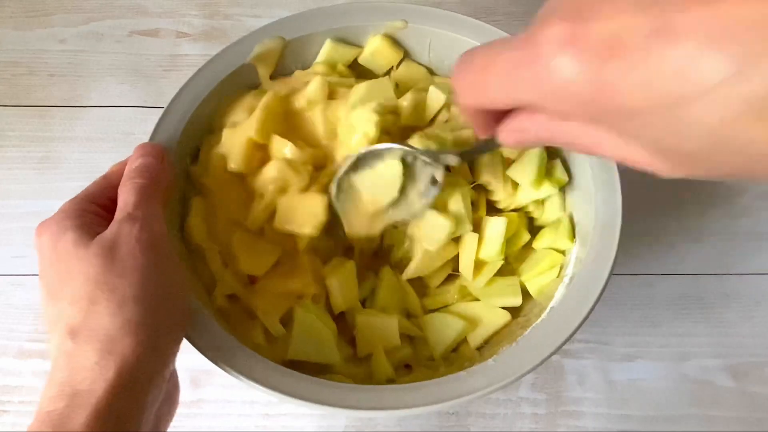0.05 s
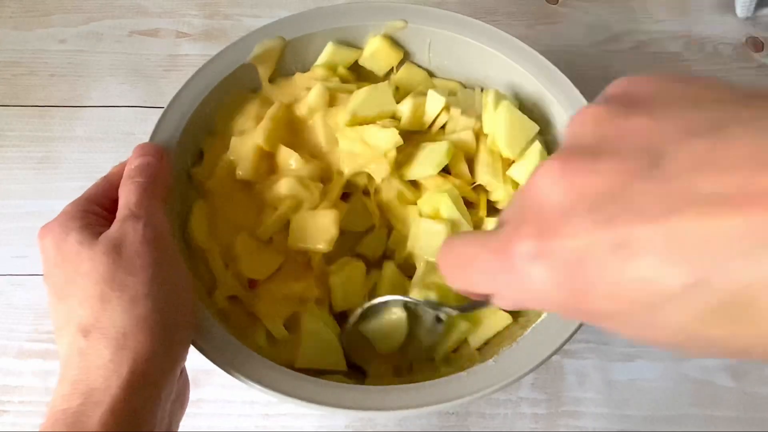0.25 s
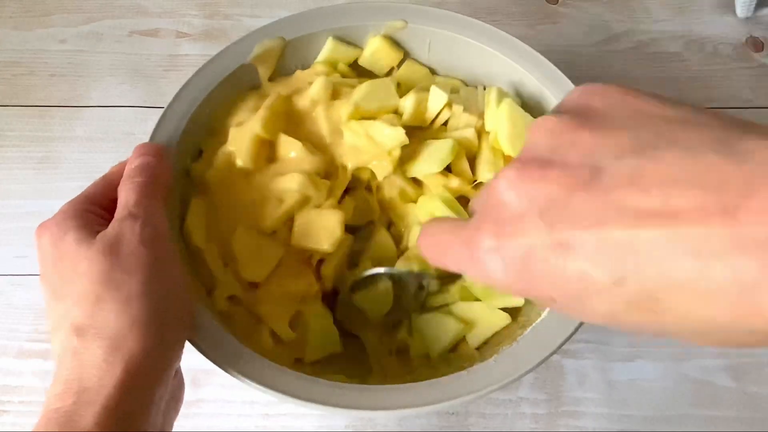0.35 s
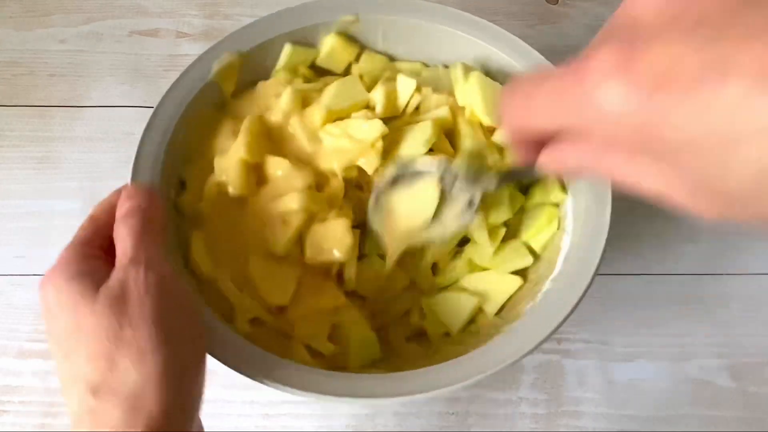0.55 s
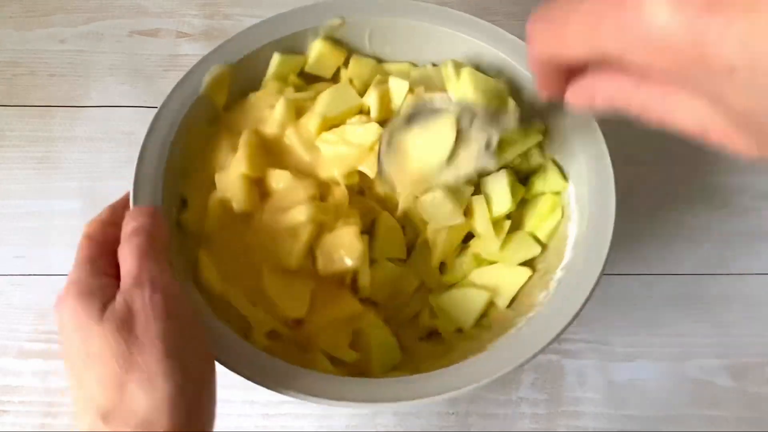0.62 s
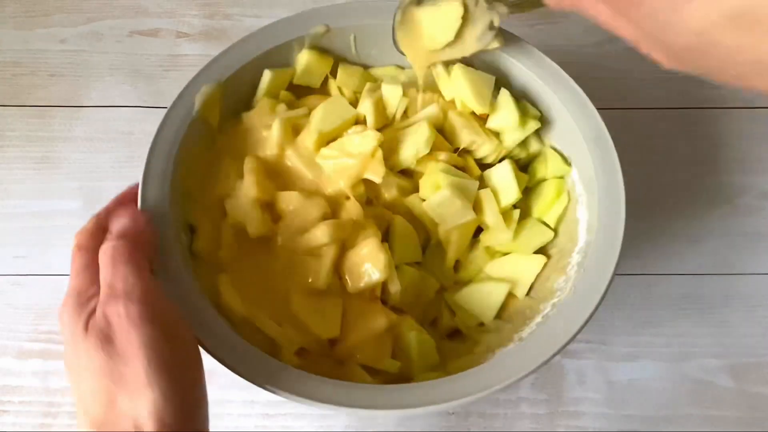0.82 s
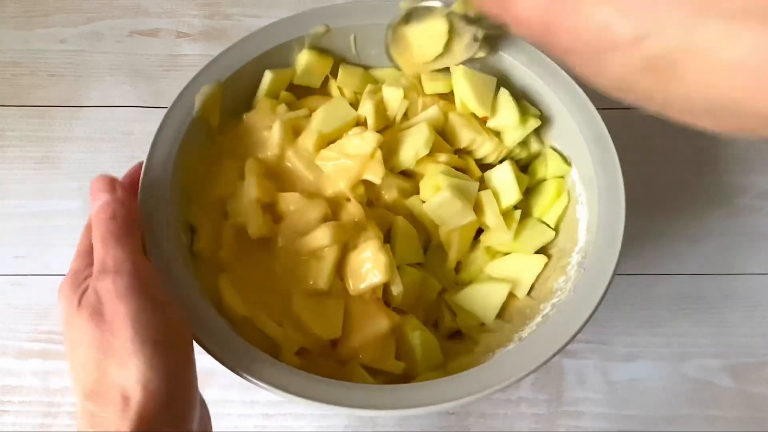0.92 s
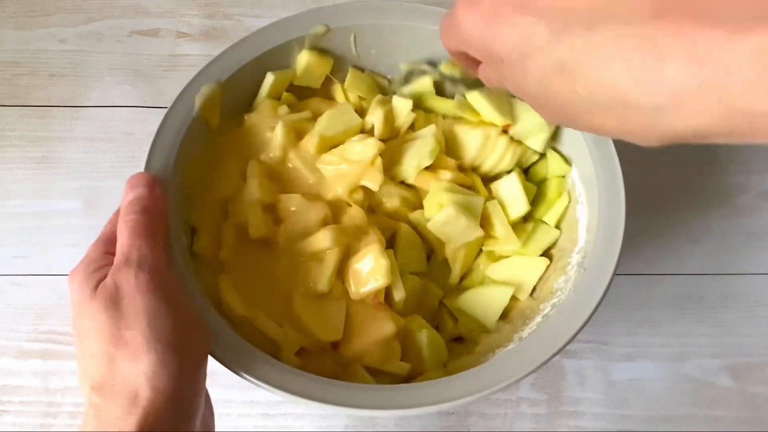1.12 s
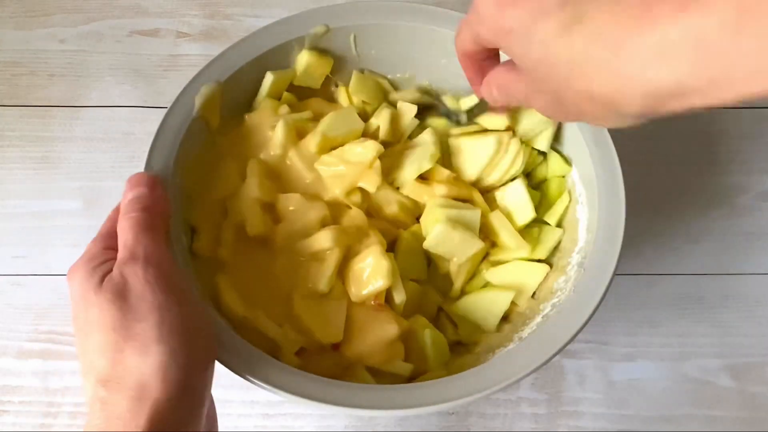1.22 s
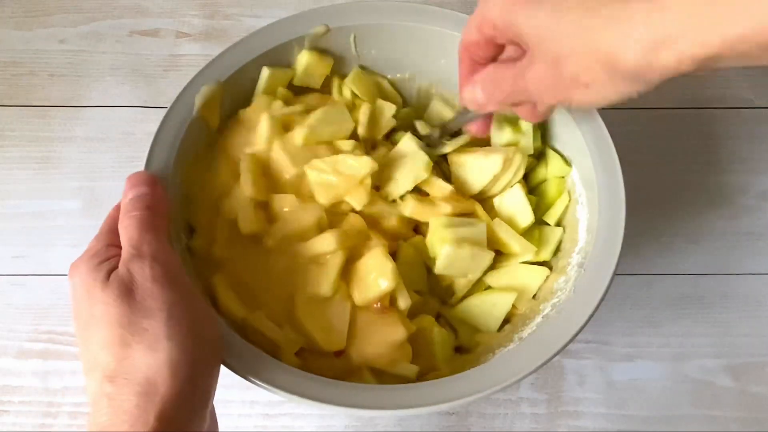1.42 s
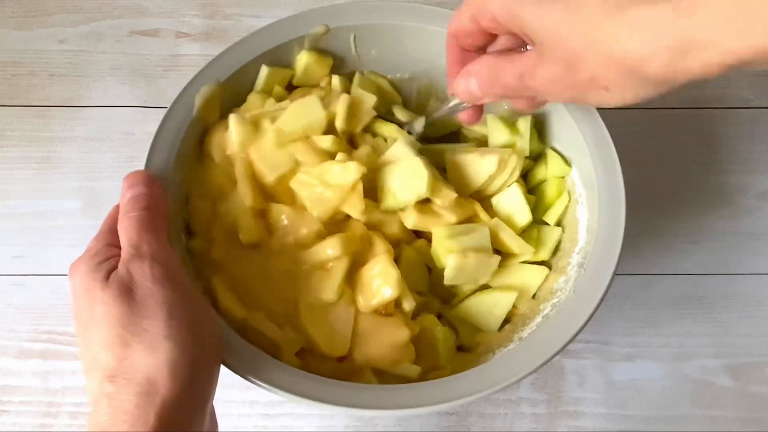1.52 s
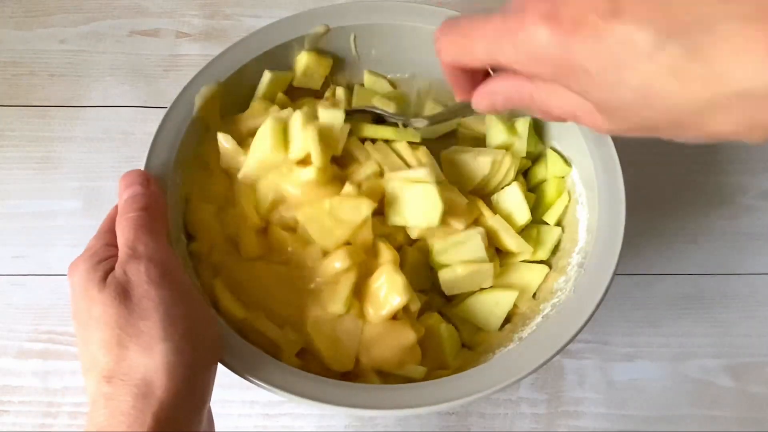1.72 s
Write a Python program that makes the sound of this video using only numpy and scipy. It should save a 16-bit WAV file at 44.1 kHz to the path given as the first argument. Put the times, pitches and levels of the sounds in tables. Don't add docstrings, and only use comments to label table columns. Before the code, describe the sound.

Spoon stirring fruit pieces through batter in a heavy bowl, with one hard knock, rasps and clicks

```python
import sys
import numpy as np
from scipy import signal
from scipy.fft import rfft, irfft, next_fast_len
from scipy.io import wavfile
from scipy.ndimage import map_coordinates

SR = 44100
rng = np.random.default_rng(int(sys.argv[2]) if len(sys.argv) > 2 else 0)


def gain_from_db(level_db):
    decades = np.asarray(level_db, float) / 20
    return 10 ** decades


def store_wav(level_fs):
    pcm = np.round(np.clip(np.atleast_2d(level_fs), -1, 1) * 32767)
    wavfile.write(sys.argv[1], SR, pcm.T.astype(np.int16))


N = 77175

# pitch_hz, level_db (per Hz)
HUM_SPECTRUM = [(25, -55), (55, 9), (100, -8.5), (170, 0.5), (270, -16.5), (480, -17), (700, -45.5),
                (1500, -53)]
HISS_SPECTRUM = [(600, 16), (1500, 20), (3000, 40), (5500, -8), (6500, -61.5), (12000, -64), (15600, -42),
                 (16200, -77)]
# pitch_hz, width_hz, level_db
PIPE_DRONE = [(489.3, 21, -64)]
# time_s, scrape_db, batter_db, loaded_spoon_db, dryness_db
STIR_GESTURE = [(0, -80, 14, 23, 11.5), (0.196, -98, 31.5, -29, 23.5), (0.219, -41.5, 2, -7, -5.5),
                (0.328, -48.5, 1, 0, 1), (0.454, -66.5, 13, 12.5, 5.5), (.69, -61.5, 11, 4, -11.5),
                (.78, -68, -2, 1.5, -16), (.838, -69.5, -2, -1, -22.5), (0.861, -68, -26, 2, 8),
                (0.952, -66.5, -24, -2, 7.5), (1.011, -41, -19, -8.5, -7), (1.15, -56, 0.5, 5.5, 5),
                (1.201, -48.5, -2, 6.5, -1), (1.29, -55.5, 1.5, 10.5, 3), (1.366, -64, -0.5, 11.5, 4.5),
                (1.53, -67.5, 13, 10, 7), (1.6, -75.5, 13, 11.5, 8.5), (1.75, -70, 7.5, 10.5, 7.5)]
# pitch_hz, level_db (per Hz)
RASP_SPECTRUM = [(300, 9.5), (900, -5), (2500, 3), (5000, -3), (7000, 0), (11000, -5), (15500, -10.5),
                 (16200, -44)]
# pitch_hz, width_hz, level_db
BARE_BOWL_MODES = [(2038, 42, -1), (2274, 80, -6), (2606, 130, -4), (2845, 74, -3.5), (3343, 145, -4.5),
                   (4900, 92, -21), (5060, 260, -22)]
LOADED_BOWL_MODES = [(904, 37, -0.5), (1262, 287, -3), (3960, 82, -8.5), (4420, 38, -8.5), (4870, 190, -12),
                     (5280, 65, -7)]
BATTER_MODES = [(358.6, 67, 0.5), (544, 162, -0.5), (836, 330, -2)]
# start_s, length_s, level_db, pitch_hz
EDGE_CHATTERS = [(.01, .1, -53.5, 190.3), (0.02, 0.046, -60.5, 342), (0.2, 0.012, -49, 2800),
                 (0.277, 0.011, -46, 6040), (0.28, 0.014, -50, 1853), (0.284, 0.069, -44, 195),
                 (0.304, 0.013, -49.5, 4540), (.335, 0.015, -52.5, 1610), (0.338, 0.01, -54, 5620),
                 (.538, 0.0096, -54.5, 1352), (.539, 0.0084, -63.5, 2800), (0.623, 0.096, -51.5, 189),
                 (.841, .011, -58, 4170), (.842, 0.0096, -56.5, 1076), (0.874, 0.014, -60.5, 2552),
                 (0.893, .025, -63, 4090), (0.897, 0.015, -65, 2150), (1.615, 0.019, -72, 2340),
                 (1.666, .04, -67.5, 2320), (.228, 0.011, -41, 2750), (.975, 0.028, -56, 5960),
                 (.976, .025, -59, 2310), (0.982, 0.029, -59.5, 4900), (0.994, .025, -51.5, 2250),
                 (1.016, 0.022, -46.5, 2820), (1.018, 0.021, -66, 5460), (1.02, 0.029, -60, 3300),
                 (1.038, .016, -55, 2520), (1.05, 0.013, -57, 5600), (1.055, 0.018, -53, 2750),
                 (1.075, 0.022, -59, 3350), (1.091, 0.022, -52, 2090), (1.094, 0.018, -55, 1290),
                 (1.103, 0.026, -55, 2800), (1.126, 0.016, -56.5, 4900), (1.132, 0.01, -52.5, 1300),
                 (1.233, 0.044, -54.5, 2800), (1.238, 0.054, -56.5, 3310), (1.287, 0.032, -60, 2750),
                 (1.4, 0.046, -62.5, 3350), (1.451, 0.046, -62.5, 2350), (1.472, 0.0088, -63, 2750),
                 (1.493, 0.017, -62.5, 3450), (1.506, 0.027, -56, 950), (1.53, 0.028, -56.5, 829),
                 (1.534, 0.015, -56, 1350)]
# time_s, pitch_hz, level_db
AIR_POCKET = [
    (1.17, 1320, -59),
    (1.2, 1320, -51.5),
    (1.235, 1330, -56),
    (1.254, 1300, -72),
    (1.275, 1290, -58),
    (1.325, 1230, -63),
    (1.392, 1250, -61),
    (1.429, 1050, -62),
    (1.5, 950, -69),
]
# pitch_hz, level_db, t60_s
BOWL_MODES = [(553, -22, 0.072), (630, 8, 0.015), (673.6, -8.5, 0.056), (738, -6, 0.067), (923, -31.5, 0.5),
              (1040, -2, 0.0017), (1317, -5.5, 0.012), (1900, -27.5, 0.06), (2456, -12.5, 0.036),
              (2668, -5.5, 0.02), (2950, -24, 0.075), (3333, -12, 0.022), (3990, -4, 0.0063),
              (6210, -21, 0.013)]
TABLE_MODES = [(76.6, -10, 0.12), (121.7, -13.5, 0.089), (188.9, -5, 0.067), (348, -7.5, 0.056),
               (394, -10, 0.091), (438.7, -3.5, 0.022)]
# start_s, level_db
LIGHT_TAPS = [
    (.2915, -33),
    (.5397, -47.5),
]
# start_s, level_db, pitch_hz, snap_db
SMALL_TICKS = [(0.2812, -40, 1840, -40), (0.293, -41.5, 1890, -15), (0.405, -44.5, 5000, 14),
               (0.54, -48.5, 2000, -32), (0.843, -46, 4010, -1.5), (0.8439, -59.5, 1170, -15),
               (0.8834, -57.5, 1270, 13), (1.0954, -47, 2130, -34), (1.164, -38.5, 2900, -28),
               (1.1755, -28.5, 5800, 1), (1.176, -31, 4950, -19), (1.1747, -33.5, 2750, -16),
               (1.424, -52, 1030, -30), (1.456, -52.5, 2310, 13), (1.495, -55, 3450, 14.5),
               (1.5462, -54, 870, -25), (1.518, -52, 850, -27), (1.6902, -46, 5370, 1.5),
               (1.713, -56, 2300, -28)]
# multiple (of its pitch), level_db
TICK_PARTIALS = [(0.641, -9.5), (0.999, 5.5), (1.33, -11.5)]
# start_s, level_db, pitch_hz
STEEL_CLICK = [
    (1.1731, -16, 5500),
    (1.1732, -25, 10500),
    (1.1732, -28, 15000),
]
# start_s, level_db, pitch_hz
FRUIT_THUDS = [
    (0.295, -55, 190),
    (0.378, -25.5, 79.4),
    (0.556, -60, 154),
    (1.1671, -23.5, 194),
    (1.165, -34, 385),
    (1.175, -23.5, 79),
    (1.265, -38, 215),
    (1.402, -29.5, 170),
    (1.443, -28.5, 146),
    (1.529, -33, 152),
]
# pitch_hz, t60_s
ROOM_DECAY = [(80, 0.87), (500, 0.28), (2000, 0.21), (8000, 0.21)]
# pitch_hz, likeness (0 to 1)
PORT_LIKENESS = [(150, 0.99), (350, 0.88), (650, 0.28), (1300, 0.57), (2500, 0.46), (4000, 0.12),
                 (5000, 0.87), (5400, 0.63)]
# pitch_hz, level_db
LEFT_OVER_RIGHT = [(150, 0.5), (370, 6.5), (850, 0), (1500, 0), (2800, -2), (3500, -1), (4300, -3.5),
                   (5500, 2)]
# pitch_hz, lead (half turns)
LEFT_PHASE_LEAD = [(5500, 0), (6500, 1), (8100, 1), (9700, 2), (11400, 2), (12600, 3), (14300, 3),
                   (15300, 4)]

TREBLE_HZ = 5500


def unit(x):
    return x / np.sqrt(np.mean(x ** 2) + 1e-20)


def along(points, hz):
    point_hz, value = np.transpose(points)
    return np.interp(np.log(hz + 1), np.log(point_hz + 1), value)


def wobble(rate):
    knots = rng.standard_normal(int(N * rate / SR) + 4)
    return map_coordinates(knots, [np.arange(N) * rate / SR])


def filtered(x, response):
    size = next_fast_len(N + SR // 2)
    return irfft(rfft(x, size) * response(np.fft.rfftfreq(size, 1 / SR)), size)[..., :N]


def resonances(peaks):
    def response(f):
        total = 0
        for k, (hz, width, db) in enumerate(peaks):
            damping = 1j * f * width
            total = total + (-1) ** k * gain_from_db(db) * damping / (hz * hz - f * f + damping)
        return total
    return response


def spread(pair, most=1):
    def angle(hz):
        turning = np.sin(np.pi * along(LEFT_PHASE_LEAD, hz)) ** 2
        treble = np.minimum(1 - 0.6 * turning, most)
        likeness = np.where(hz < TREBLE_HZ, along(PORT_LIKENESS, hz), treble)
        return np.arccos(np.clip(likeness, -1, 1)) / 2

    mid, side = filtered(pair, lambda hz: np.array([np.cos(angle(hz)), np.sin(angle(hz))]))
    return np.array([mid + side, mid - side])


def ring(hz, t60, rise_s):
    t = np.arange(SR // 2) / SR
    return gain_from_db(-60 * t / t60) * (1 - np.exp(-t / rise_s)) * np.sin(2 * np.pi * hz * t)


def crack(t60, rise_s):
    t = np.arange(SR // 10) / SR
    return gain_from_db(-60 * t / t60) * (1 - np.exp(-t / rise_s)) * rng.standard_normal(SR // 10)


def add(track, s, sound):
    part = track[round(s * SR):][:len(sound)]
    part += sound[:len(part)]


def narrow(phase, width_hz):
    slow = np.array([wobble(width_hz) + 1j * wobble(width_hz) for _ in range(2)])
    return (slow * np.exp(1j * phase)).real


def kitchen():
    t = np.arange(N) / SR
    hum = unit(filtered(rng.standard_normal((2, N)), lambda hz: gain_from_db(along(HUM_SPECTRUM, hz))))
    hiss = unit(filtered(rng.standard_normal((2, N)), lambda hz: gain_from_db(along(HISS_SPECTRUM, hz))))
    whine = np.sin(2 * np.pi * 5426 * t + 0.9 * wobble(44)) * gain_from_db(-79.5 + 3 * wobble(38))
    whine_stops_s, fade_s = 0.885, 0.02
    whine = whine * np.clip((whine_stops_s - t) / fade_s, 0.3, 1)
    pipe_hz, width_hz, pipe_db = PIPE_DRONE[0]
    drone = np.sin(2 * np.pi * pipe_hz * t + 0.38 * wobble(width_hz)) * gain_from_db(pipe_db + 2.2 * wobble(12.06))
    return spread(gain_from_db(-50 + wobble(6.0)) * hum + gain_from_db(-89.5) * hiss) + whine + drone


def scrape():
    time_s, *columns = np.transpose(STIR_GESTURE)
    level_db, batter_db, load_db, dry_db = [np.interp(np.arange(N) / SR, time_s, c) for c in columns]
    grains_per_s, grain_spread_db, biggest_grain = 2800, 4.5, 2.5
    size = gain_from_db(grain_spread_db * np.minimum(rng.exponential(size=(4, N)), biggest_grain))
    size = size * (rng.random((4, N)) < grains_per_s / SR)
    grains = (size[:, None] + 0.46) * rng.standard_normal((4, 2, N))
    rasp = unit(filtered(grains[0], lambda hz: gain_from_db(along(RASP_SPECTRUM, hz))))
    rasp = rasp * gain_from_db(0.5 + dry_db + wobble(40.37))
    bare = unit(filtered(grains[1], resonances(BARE_BOWL_MODES)))
    bare = bare * gain_from_db(-7.5 - 0.068 * dry_db + 2.2 * wobble(37.04))
    loaded = unit(filtered(grains[2], resonances(LOADED_BOWL_MODES)))
    loaded = loaded * gain_from_db(-9.5 + load_db + 0.64 * wobble(43.64))
    batter = unit(filtered(grains[3], lambda hz: resonances(BATTER_MODES)(hz) ** 2))
    batter = batter * gain_from_db(-5 + batter_db + 1.3 * wobble(32.37))
    return spread(gain_from_db(level_db) * (rasp + bare + loaded + batter))


def catches():
    t = np.arange(N) / SR
    chatter = np.zeros((2, N))
    for s, length, db, hz in EDGE_CHATTERS:
        swell = np.sin(np.pi * np.clip((t - s) / length, 0, 1))
        on = swell > 1e-9
        edge = narrow(2 * np.pi * hz * t, 0.17 * hz)
        chatter[:, on] += gain_from_db(db) * swell[on] * edge[:, on]
    s, hz, db = np.transpose(AIR_POCKET)
    hollow = narrow(2 * np.pi * np.cumsum(np.interp(t, s, hz)) / SR, 130)
    hollow_db = np.interp(t, s, db, -120, -120) + 1.0 + 1.5 * wobble(60.75)
    return spread(chatter + hollow * gain_from_db(hollow_db))


def knock():
    out = np.zeros(N)
    bowl = (BOWL_MODES, 1.5, 0.35)
    table = (TABLE_MODES, 1.647, 0.081)
    blows = [(0.2126, -9.5, (bowl, table))] + [(s, db, (bowl,)) for s, db in LIGHT_TAPS]
    for s, blow_db, bodies in blows:
        for modes, lag, rise in bodies:
            for hz, db, t60 in modes:
                add(out, s + lag / hz, gain_from_db(blow_db + db) * ring(hz, t60, rise / hz))
        add(out, s, gain_from_db(blow_db - 19.5) * crack(0.019, 0.00045))
    return out


def ticks():
    out = np.zeros(N)
    for s, db, hz, snap_db in SMALL_TICKS:
        for multiple, part_db in TICK_PARTIALS:
            add(out, s, gain_from_db(db + part_db) * ring(multiple * hz, 18 / hz, 0.11 / hz))
        add(out, s, gain_from_db(db + snap_db) * np.diff(crack(0.026, 0.003)))
    for s, db, hz in STEEL_CLICK:
        add(out, s, gain_from_db(db) * ring(hz, 0.0016, 0.00012))
    for s, db, hz in FRUIT_THUDS:
        add(out, s, gain_from_db(db) * ring(hz, 3.55 / hz, 0.46 / hz))
    return out


def room(x):
    delay_s = 0.0044
    hz, t, z = signal.stft(rng.standard_normal((2, SR // 2)), SR, nperseg=256)
    decay = gain_from_db(-60 * t / along(ROOM_DECAY, hz)[:, None])
    tail = signal.istft(z * decay, SR, nperseg=256)[1]
    tail = tail / np.linalg.norm(tail[0])
    late = np.pad(x, (round(delay_s * SR), 0))[None]
    return spread(signal.fftconvolve(late, tail, axes=1)[:, :N])


def scene():
    hits = knock() + ticks()
    quarter_turn = filtered(hits, lambda hz: -1j + 0 * hz)
    direct = spread(np.array([hits, quarter_turn]), most=0.8)
    return direct + gain_from_db(-13.5) * room(hits) + scrape() + kitchen() + catches()


def top_cut(x):
    return signal.sosfilt(signal.butter(12, 16970, fs=SR, output="sos"), x)


def record(dry):
    low_hz, top_hz = 40, 16000

    def half(hz):
        level = gain_from_db(along(LEFT_OVER_RIGHT, hz) * (hz < TREBLE_HZ) / 2)
        return level * np.exp(0.5j * np.pi * along(LEFT_PHASE_LEAD, hz))

    def band(hz):
        low_cut = (1j * hz / low_hz / (1 + 1j * hz / low_hz)) ** 3
        return (hz < top_hz) * low_cut

    ports = filtered(dry, lambda hz: band(hz) * np.array([half(hz), 1 / half(hz)]))
    return top_cut(ports)


dry = scene()
out = record(dry)
store_wav(out)
```